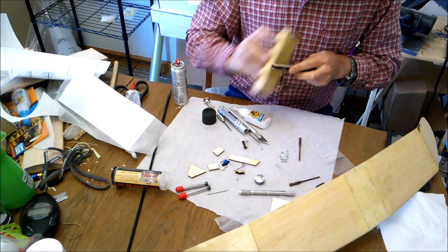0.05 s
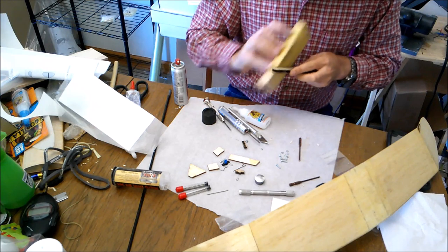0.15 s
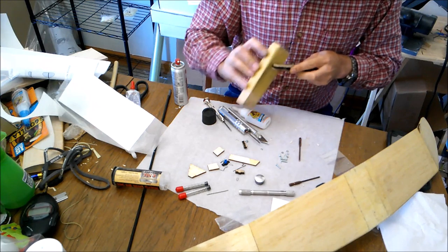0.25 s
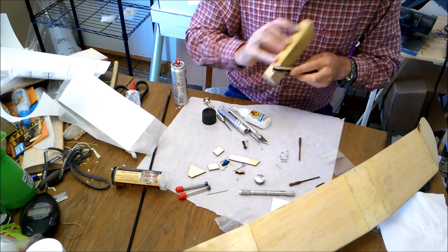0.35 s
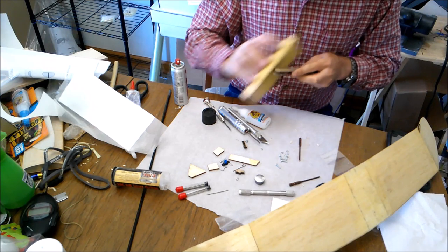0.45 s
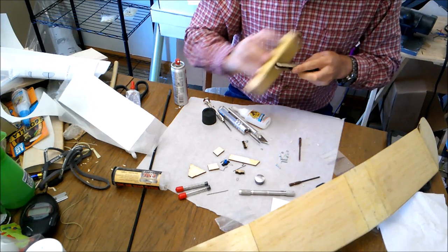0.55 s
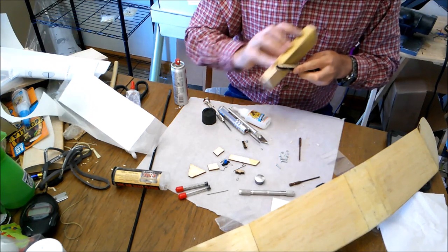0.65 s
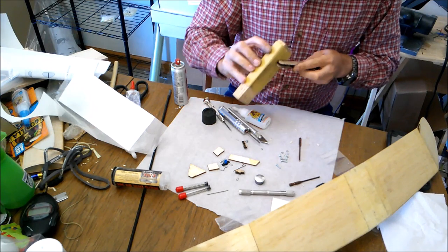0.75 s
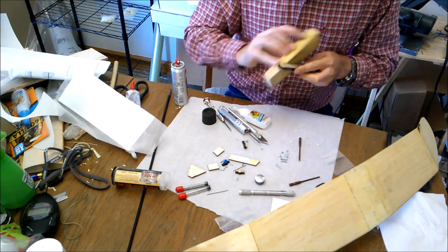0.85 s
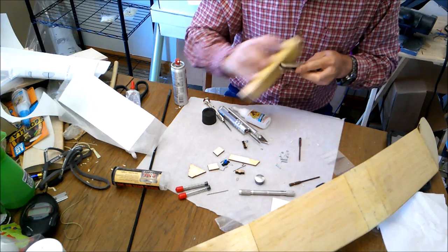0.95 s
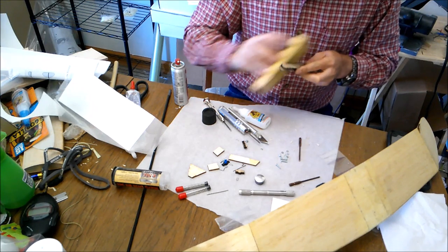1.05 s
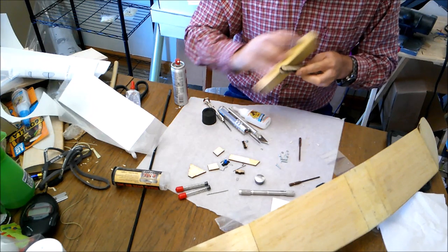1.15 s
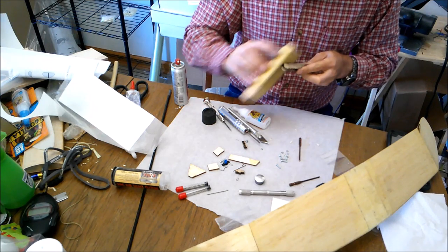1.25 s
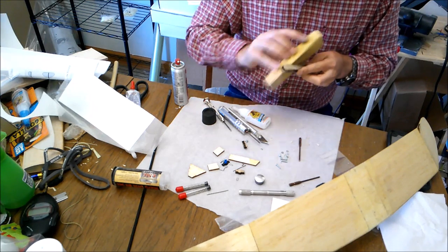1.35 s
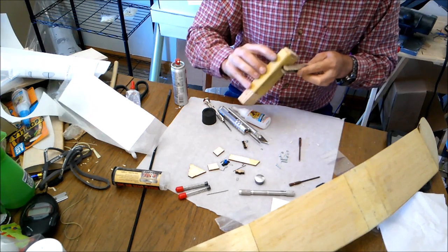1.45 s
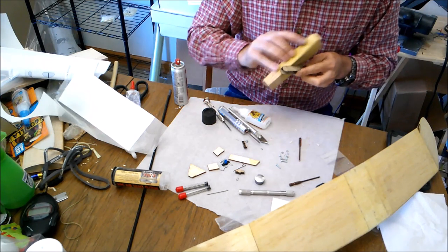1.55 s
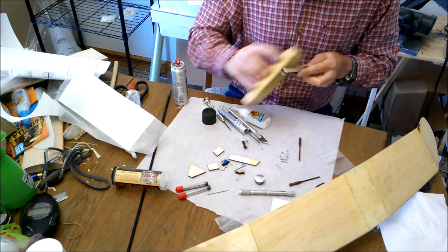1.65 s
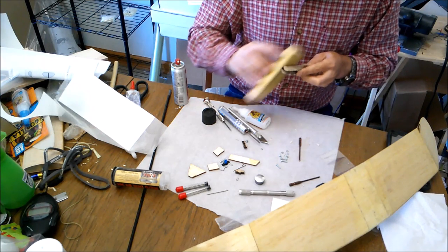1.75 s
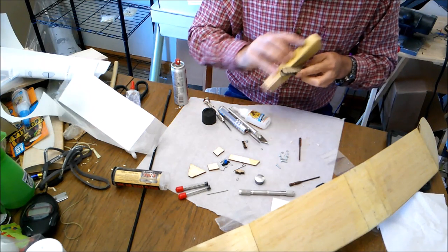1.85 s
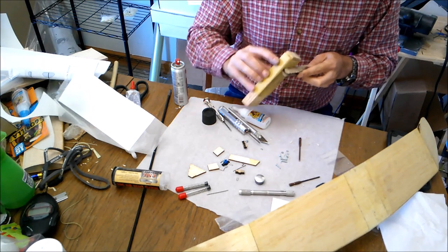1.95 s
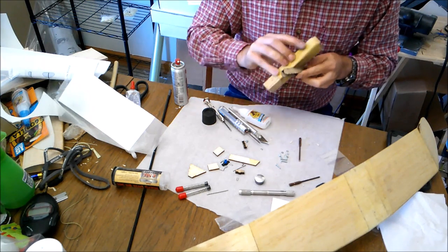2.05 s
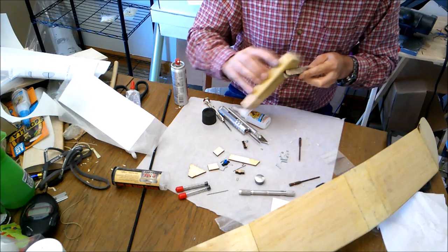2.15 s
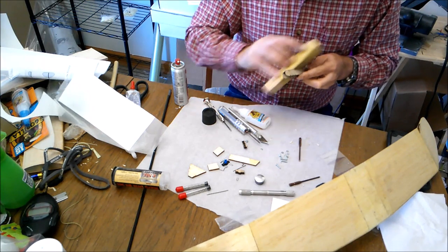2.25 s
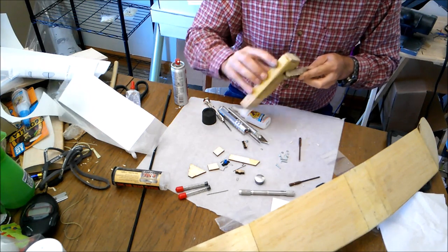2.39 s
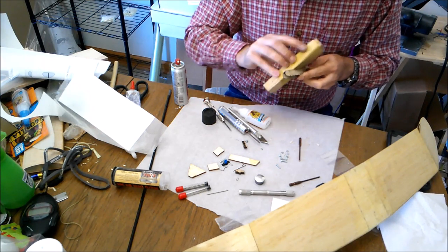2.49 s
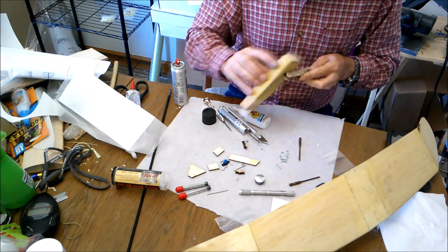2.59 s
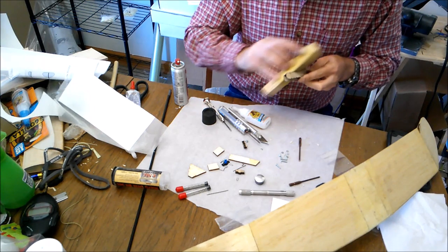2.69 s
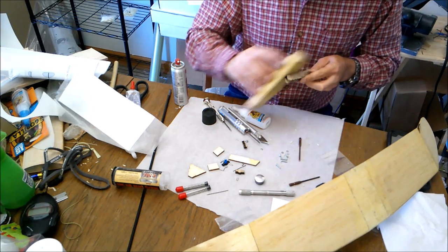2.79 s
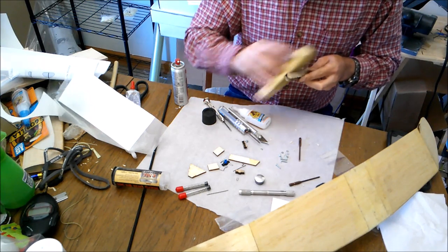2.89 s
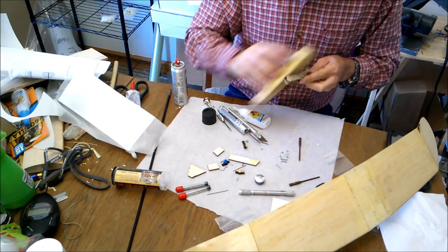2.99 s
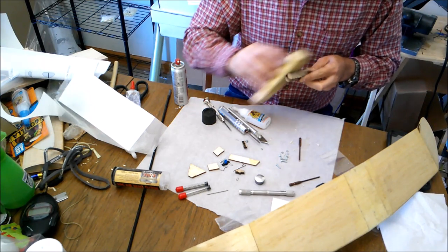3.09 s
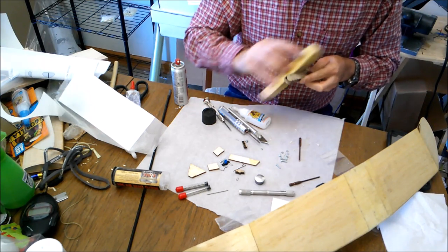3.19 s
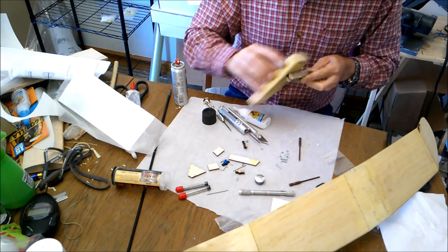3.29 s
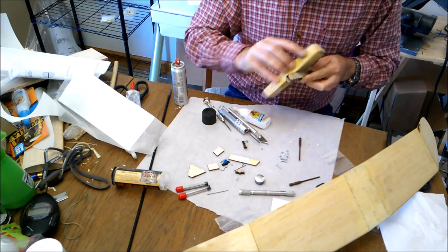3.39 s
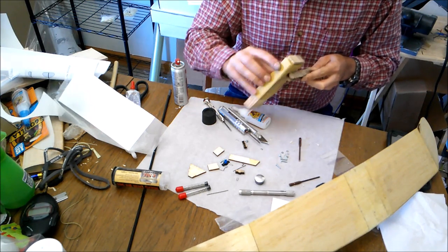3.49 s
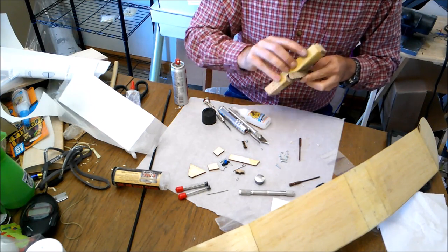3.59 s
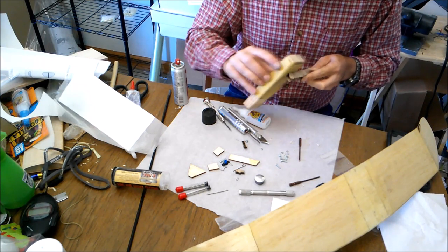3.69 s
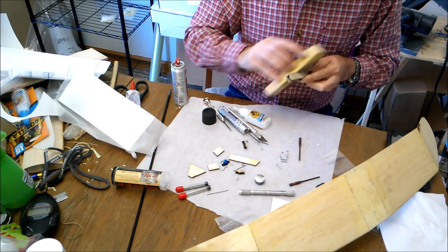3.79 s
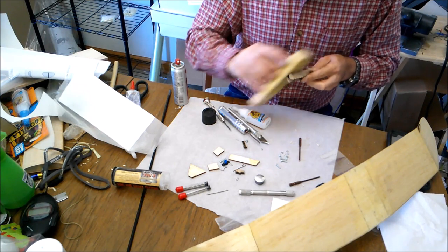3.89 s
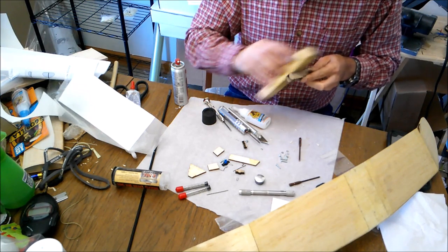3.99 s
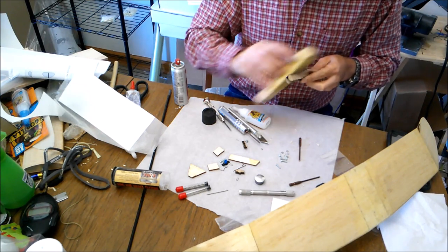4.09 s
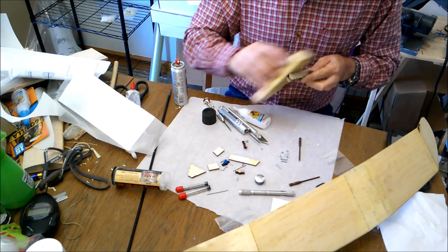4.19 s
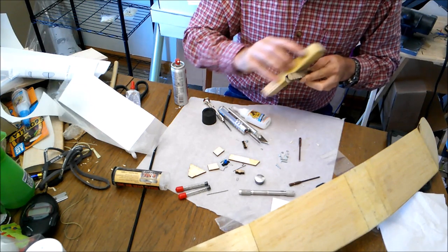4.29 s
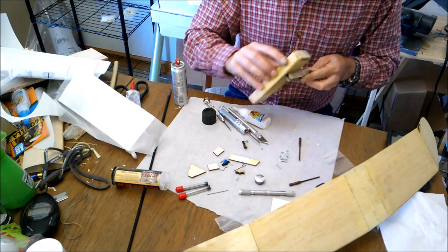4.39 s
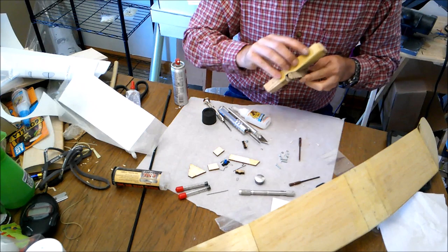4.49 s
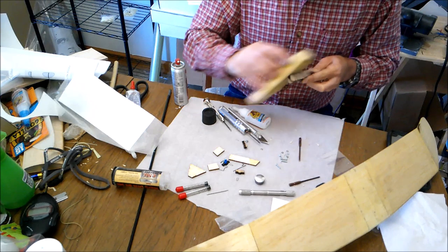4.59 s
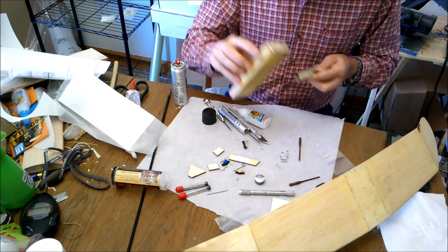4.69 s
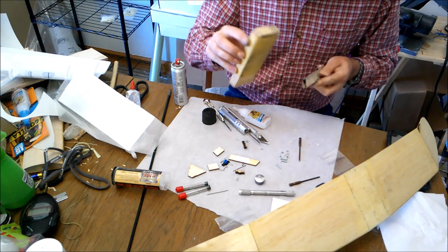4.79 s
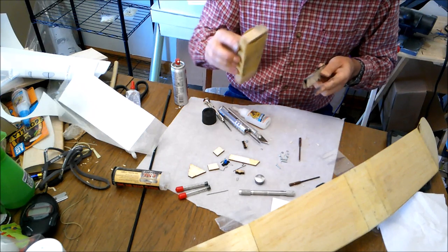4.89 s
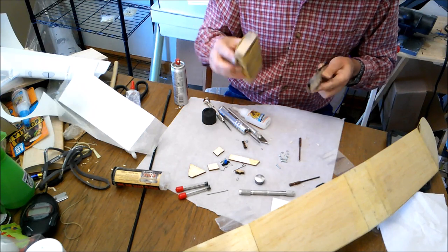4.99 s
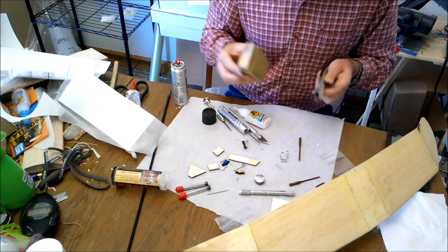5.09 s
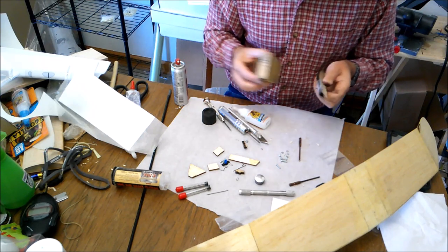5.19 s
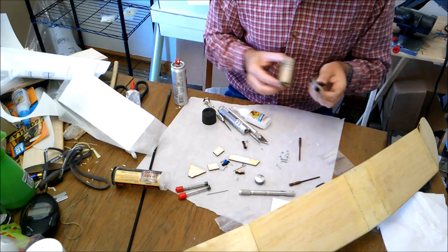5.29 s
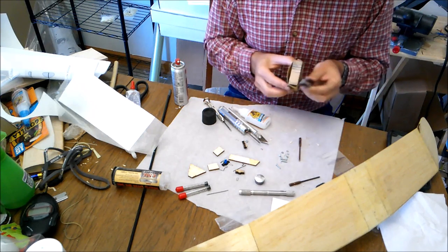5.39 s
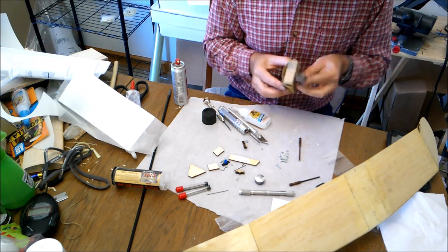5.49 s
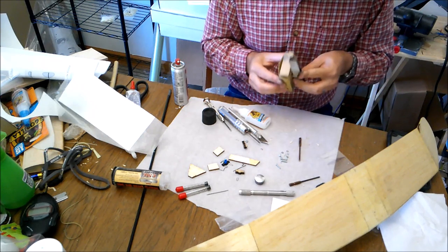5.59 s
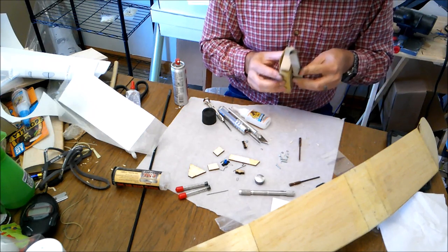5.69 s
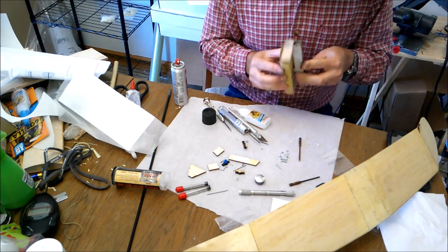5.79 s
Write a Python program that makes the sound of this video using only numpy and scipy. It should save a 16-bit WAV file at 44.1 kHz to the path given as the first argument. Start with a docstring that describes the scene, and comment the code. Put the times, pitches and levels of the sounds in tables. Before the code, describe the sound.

From the start, a sanding block rubs rapidly back and forth over a small, light wooden part, about nine strokes a second. The sound is close, dry and scratchy, with a slightly hollow wooden ring that shifts between push and pull. The first strokes are loudest, and the grit catches briefly at around 0.4 seconds. The rhythm stays even while the strokes gradually soften, stopping at about 4.6 seconds. In the pause there is a tiny tick at 4.8 seconds, then faint rustles and small scrapes of fingers regripping sandpaper and wood from 5.4 to 5.7 seconds. At about 5.8 seconds the block lands on the part with one light, short tap, and a soft new stroke begins. Underneath, a small workshop with very little echo gives a faint, steady air noise and a low electrical hum.

```python
"""Sanding balsa by hand

A sanding block is pushed and pulled over a small balsa part, about nine strokes a second.
Its grit scratches the wood and makes both block and part ring; the tone shifts as the contact moves.
The hands pause and regrip, then the block taps the part and starts again. The workshop hums faintly."""
import sys
import numpy as np
from scipy import signal
from scipy.fft import rfft, irfft
from scipy.io import wavfile

SR = 44100
rng = np.random.default_rng(int(sys.argv[2]) if len(sys.argv) > 2 else 0)


def wav_out(sig):
    """Save sig, one row per channel (or a flat mono array), as 16-bit PCM at SR to the path in sys.argv[1]."""
    wavfile.write(sys.argv[1], SR, np.round(np.clip(np.atleast_2d(sig).T, -1, 1) * 32767).astype(np.int16))


N = 257984
T = np.arange(N) / SR
HZ = np.fft.rfftfreq(N, 1 / SR)

# The strokes, push and pull in turn: start_s, level_db, brightness_db, pressure_rise_db
HAND_STROKES = [(0.023, -37.5, -1.5, 1), (0.15, -39.0, -2, 0.5), (0.274, -38.5, -0.5, 3.5),
                (0.394, -38.5, -2, 6.5), (0.53, -40.5, -0.5, 4.5), (0.66, -40.5, 1.0, 1),
                (0.783, -40, 0, 1), (0.905, -41.0, 1.0, -2.5), (1.027, -40, 1.5, 0.5),
                (1.142, -40.5, 1.0, 0.5), (1.258, -41, -1, 1.5), (1.372, -40.5, -0.5, -1),
                (1.493, -41.5, 0, 4.5), (1.599, -40.5, 0, 2), (1.72, -42.0, -2.5, 2.5),
                (1.832, -41, -1, -1.5), (1.954, -42.5, -1, 0), (2.061, -41.5, 0.5, 0.5),
                (2.173, -41.0, -0.5, 4.5), (2.275, -42.0, 1.0, -1.5), (2.391, -41, -0.5, -2.5),
                (2.495, -41.5, 0.5, -3.5), (2.608, -42.0, 0, -1), (2.715, -42, 1, -2.0),
                (2.829, -42, 0.5, 4.5), (2.938, -42.0, 1.5, -0.5), (3.044, -43, 2, 4),
                (3.155, -43.5, 1, -3.5), (3.268, -44.5, 0.5, 1.5), (3.371, -44.0, 0.5, 0),
                (3.489, -43, 1.5, 1.5), (3.593, -44, 0, 2), (3.703, -44.0, 3, -1), (3.815, -44.5, 0.5, 1.5),
                (3.935, -44.0, 2.5, -0.5), (4.04, -43.0, 0.5, 1), (4.147, -43.5, 2.5, 4),
                (4.256, -46.5, 1, -1.5), (4.385, -47.5, 2, -1.5), (4.51, -46.5, 0.5, -2),
                (5.776, -51.0, -0.5, 6)]


def sanding(judder_db=1.0, judder_hz=150, worn_db=1.46, worn_hz=35, pivot_hz=2400):
    """Grit dragged over the wood scratches it and makes the block and the part ring."""
    stroke, travel, speed = arm_motion()
    _, level_db, brightness_db, pressure_rise_db = np.array(HAND_STROKES)[stroke].T
    # How steeply the sound grows with speed: pitch_hz, exponent
    speed_powers = [(500, 0.39), (1500, 0.64), (2800, 0.86), (4500, 1.04), (7000, 0.6)]

    def drive(hz):
        """How hard the rubbing excites one pitch; unevenly worn sandpaper makes it flicker."""
        tilt_db = brightness_db * np.log2(hz / pivot_hz) / 2
        return speed ** read(speed_powers, hz) * amp(tilt_db + worn_db * wander(worn_hz))

    sound = scratching(drive) + block_ringing(stroke, travel, speed, drive)
    sound += drive(pivot_hz) * part_ringing(stroke, travel, level_db)
    # The hand leans in or eases off, and the light part judders against the block.
    return sound * amp(level_db + pressure_rise_db * (travel - .5) + judder_db * judder(judder_hz))


def arm_motion(longest_s=0.15, stick=0.079, stop=0.87, skew=0.89, creep=0.059, cruise=1.18):
    """The block sticks at each turn, breaks free, soon reaches an even speed and coasts to a halt."""
    start_s = np.array(HAND_STROKES)[:, 0]
    length_s = np.minimum(np.diff(start_s, append=np.inf), longest_s)
    stroke = np.maximum(np.searchsorted(start_s, T) - 1, 0)  # even = push, odd = pull
    phase = (T - start_s[stroke]) / length_s[stroke]
    travel = np.clip((phase - stick) / (stop - stick), 0, 1)  # 0 to 1 along the stroke
    speed = np.tanh(cruise * abs(np.sin(np.pi * travel ** skew))) + creep * (phase < 1)
    return stroke, travel, speed


def scratching(drive, gain_db=0.96):
    """The broad hiss of grit cutting wood, brighter when the block moves faster."""
    # Tone colour of the hiss: pitch_hz, relative_db
    hiss_colour = [(200, -35.5), (420, -15.5), (580, -9), (1100, -5), (1600, 0.5), (2400, -1.5), (3150, 0),
                   (3420, -2), (3900, -4.5), (4400, -11), (4950, -15), (5850, -13.5), (6500, -8.5),
                   (7500, -12)]
    spectrum = rfft(coloured(grit(), hiss_colour))
    bands_hz = np.geomspace(400, 7500, 10)
    sound = np.zeros(N)
    for hz, share in zip(bands_hz, np.eye(len(bands_hz))):
        band = irfft(spectrum * read(np.c_[bands_hz, share], HZ), N)
        sound += drive(hz) * band
    return amp(gain_db) * sound


def block_ringing(stroke, travel, speed, drive, gain_db=4.5, bite_db=2.5, bite_span=0.48):
    """Each tone of the block rings most as the contact passes its own place on the block."""
    # The block's tones: pitch_hz, half_width_hz, push_db, pull_db, best_place (0 to 1), place_spread
    block_tones = [(618, 31, -24.5, -30, 0.5, 0.4), (800.4, 31, -21.5, -23.5, .47, 0.66),
                   (942, 26, -17.5, -22.5, 0.3, .6), (1098, 46, -26, -28.5, 0.3, 0.24),
                   (1304, 230, -22, -14, 0.87, 0.18), (1740, 400, -22, -27.5, 0, 0.18),
                   (2094, 110, -4, -7.5, .05, 0.095), (2224, 15, -14.5, -17, 0.6, 1),
                   (2845, 280, -7, -10, 0.66, 0.46), (3850, 190, -21.5, -37, 0.9, 0.51),
                   (5340, 130, -27.5, -22, 0.3, .3), (6790, 640, -16, -19.5, 0.35, 0.35)]
    pull = stroke % 2
    place = .5 - .5 * np.cos(np.pi * (travel + pull))
    # As a stroke gathers speed, it bites into the tones that live near the block's ends.
    early_bite_db = (bite_db + 1.5 * per_stroke(stroke)) * speed * np.exp(-(travel / bite_span) ** 4)
    sound = np.zeros(N)
    for hz, half_width_hz, push_db, pull_db, best_place, spread in block_tones:
        nearness = np.exp(-.5 * ((place - best_place) / spread) ** 2)
        tone_db = np.where(pull, pull_db, push_db) + early_bite_db * 2 * abs(best_place - .5)
        sound += amp(gain_db + tone_db) * nearness * drive(hz) * ring(hz, half_width_hz)
    return sound


def part_ringing(stroke, travel, level_db, easy_stroke_db=-41.5, gain_db=-4.5):
    """The part rings lower and louder under force, and glides as the block presses at a changing angle."""
    pull = stroke % 2  # each np.where below gives the pull's value, then the push's
    force_db = np.maximum(level_db - easy_stroke_db, 0)
    sag_hz = np.where(pull, 35.5, 48) * force_db
    middle_hz = np.where(pull, 2930, 2820) - sag_hz + 80 * per_stroke(stroke)
    glide_hz = np.where(pull, -240, -61.5) + 180 * per_stroke(stroke)
    ring_db = gain_db + np.where(pull, 0.37, 1.46) * force_db + per_stroke(stroke)
    return amp(ring_db) * ring(middle_hz + glide_hz * (travel - .5), half_width_hz=393)


def snags():
    """The wood catches and grates for a moment."""
    # Each snag: peak_s, level_db, pitch_hz, width_hz, half_length_s
    snag_events = [(0.361, -49.5, 600, 710, 0.017), (0.44, -42.5, 786, 1100, 0.015),
                   (4.801, -54.5, 2400, 1100, 0.0015), (5.383, -54.5, 2470, 1100, 0.0049),
                   (5.595, -54, 1630, 1200, 0.017)]
    return sum(amp(db) * swell(peak_s, half_length_s) * ring(hz, width_hz / 2)
               for peak_s, db, hz, width_hz, half_length_s in snag_events)


def tap(start_s=5.7826, gain_db=-40.5, rise_s=0.00016):
    """The block lands on the part and rings the wood for a few milliseconds."""
    # Tones of the struck wood: pitch_hz, relative_db, fade_s (time to fall by 60 dB)
    wood_tones = [(1130, 1, .011), (1370, 2, .011), (2230, -1, 0.0098), (2670, 2, 0.0094),
                  (3650, 1, 0.0059), (6900, -6, 0.0052)]
    age_s = np.maximum(T - start_s, 0)
    knock = sum(amp(db - 60 * age_s / fade_s) * np.sin(2 * np.pi * (hz * age_s + rng.random()))
                for hz, db, fade_s in wood_tones)
    return amp(gain_db) * knock * (1 - np.exp(-age_s / rise_s))


def fingers(uneven_db=1.5, uneven_hz=90):
    """Fingers rustle faintly over sandpaper and wood as they take a new grip."""
    # Each slide of the fingers: peak_s, half_length_s, level_db
    rubs = [(5.436, 0.042, -57), (5.528, 0.042, -51.5), (5.638, 0.019, -60)]
    # Tone colour of the rustle: pitch_hz, relative_db
    rustle_colour = [(300, -3), (900, -27), (1800, -8.5), (2900, -1), (3600, -13.5), (4900, -33),
                     (6200, -14), (7600, -19.5)]
    level = sum(amp(db) * swell(peak_s, half_length_s) for peak_s, half_length_s, db in rubs)
    return level * amp(uneven_db * wander(uneven_hz)) * coloured(grit(grains_per_s=2500), rustle_colour)


def workshop(air_db=-54.5, waver_db=2.5, waver_hz=4, drift_cycles=0.091):
    """Steady rumble and air noise, a wavering mains hum, and a faint low tone that swells in the pause."""
    # Tone colour of the quiet room: pitch_hz, relative_db
    air_colour = [(10, -3.5), (25, 2), (45, -2), (80, -5.5), (110, -7.5), (150, -8), (190, -13.5),
                  (300, -13.5), (500, -17), (1080, -15), (2790, -26.5), (4700, -47.5), (7200, -36),
                  (8000, -42)]
    # Tones of the mains hum: pitch_hz, relative_db
    hum_tones = [(58.5, -6), (119.8, -2.5)]
    # The hum sinks for a while and comes back: time_s, level_db
    hum_levels = [(0, -62.5), (1.0, -58.5), (2.7, -60), (3.05, -68.5), (3.9, -68), (4.8, -61),
                  (5.85, -59.5)]

    def tone(hz, level_db):
        """A slightly unsteady pure tone."""
        level = amp(level_db + waver_db * wander(waver_hz))
        return level * np.sqrt(2) * np.sin(2 * np.pi * (hz * T + drift_cycles * wander(waver_hz)))

    low_tone = swell(peak_s=5.21, half_length_s=0.4) * tone(hz=229.4, level_db=-66)
    hum_db = np.interp(T, *np.transpose(hum_levels))
    hum = sum(tone(hz, hum_db + db) for hz, db in hum_tones)
    return hum + low_tone + amp(air_db) * coloured(rng.standard_normal(N), air_colour)


def room(x, bench_db=-13, bench_delay_s=0.001615, tail_db=-13, tail_delay_s=.006):
    """Adds one reflection off the bench, then the short echo of a cluttered room."""
    # How long the echo lasts: pitch_hz, fade_s (time to fall by 60 dB)
    fade_times = [(300, 0.2), (2000, .2), (7000, 0.27)]
    hz, t, noise = signal.stft(rng.standard_normal(SR // 2), SR, nperseg=256)
    tail = signal.istft(noise * amp(-60 * t / read(fade_times, hz)[:, None]), SR, nperseg=256)[1]
    echo = signal.fftconvolve(x, tail / np.linalg.norm(tail))[:N]
    bounce = amp(bench_db) * np.interp(T - bench_delay_s, T, x)
    return x + bounce + amp(tail_db) * np.interp(T - tail_delay_s, T, echo)


def grit(grains_per_s=9000, fine_gain=0.84):
    """Countless tiny breaks in the wood, with single coarse grains catching among them."""
    coarse = rng.standard_normal(N) * (rng.random(N) < grains_per_s / SR)
    return unit(unit(coarse) + fine_gain * rng.standard_normal(N))


def ring(hz, half_width_hz):
    """Grit ringing around one steady or gliding pitch; a narrower width gives a clearer note."""
    spin = np.exp(2j * np.pi * np.cumsum(hz * np.ones(N)) / SR)
    decay = np.exp(-2 * np.pi * half_width_hz / SR)
    # Shift the pitch down to 0 Hz, smooth away everything far from it, then shift back.
    smoothed = signal.lfilter([1], [1, -2 * decay, decay * decay], grit() / spin)
    return unit((spin * smoothed).real)


def per_stroke(stroke):
    """One random number held through each stroke, so no two sound alike."""
    return rng.standard_normal(len(HAND_STROKES))[stroke]


def judder(rate_hz):
    """Fast random shaking with no slow drift."""
    ratio = HZ / rate_hz
    return unit(irfft(rfft(rng.standard_normal(N)) * ratio / (1 + ratio ** 2) ** 2, N))


def wander(rate_hz):
    """Smooth random motion, mostly slower than rate_hz."""
    return unit(irfft(rfft(rng.standard_normal(N)) / (1 + (HZ / rate_hz) ** 2) ** 2, N))


def swell(peak_s, half_length_s):
    """A bell-shaped rise and fall."""
    return np.exp(-((T - peak_s) / half_length_s) ** 2)


def coloured(x, points):
    """Gives x the tone colour of (pitch_hz, relative_db) points, at an average level of one."""
    return unit(irfft(rfft(x) * amp(read(points, HZ)), N))


def read(points, hz):
    """Reads between (pitch_hz, value) points, with octaves evenly spaced."""
    pitch_hz, value = np.transpose(points)
    return np.interp(np.log(hz + 1), np.log(pitch_hz + 1), value)


def unit(x):
    """Scales x to an average (rms) level of one."""
    return x / np.sqrt(np.mean(x ** 2) + 1e-20)


def amp(db):
    """Turns decibels into a gain."""
    return 10 ** (np.asarray(db) / 20)


def scene():
    """The work at the bench, the same on both channels."""
    mono = room(sanding() + fingers() + snags() + tap()) + workshop()
    return np.array([mono, mono])


def record(dry, cutoff_hz=7830):
    """The microphone loses the highest treble."""
    low_pass = signal.firwin(221, cutoff_hz, window=("kaiser", 8), fs=SR)
    return signal.oaconvolve(dry, low_pass[None], "same")


dry = scene()
out = record(dry)
wav_out(out)
```